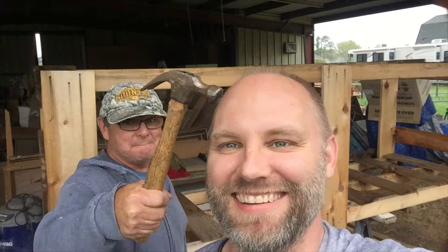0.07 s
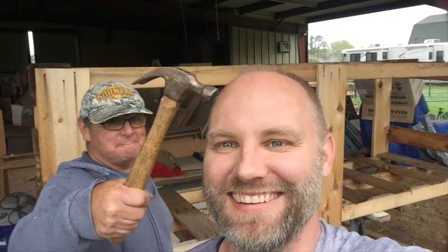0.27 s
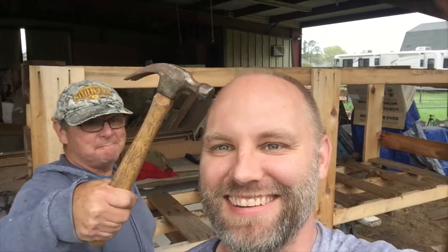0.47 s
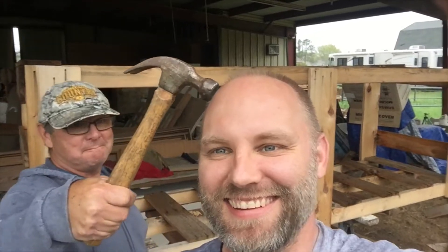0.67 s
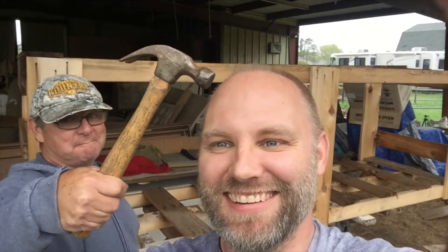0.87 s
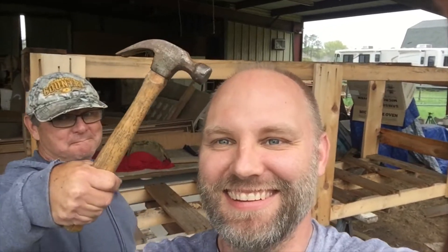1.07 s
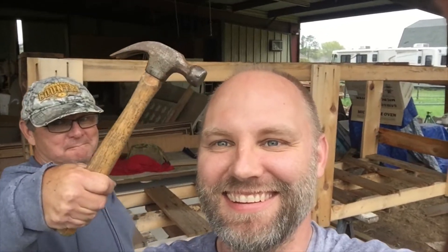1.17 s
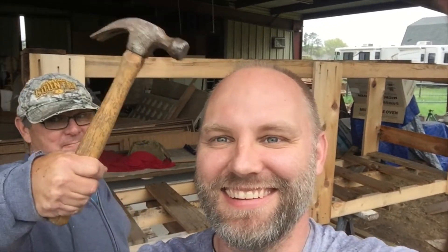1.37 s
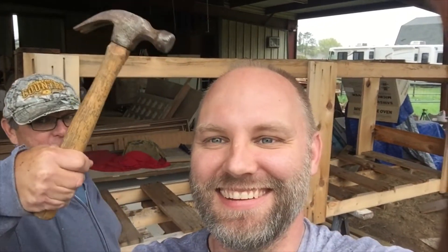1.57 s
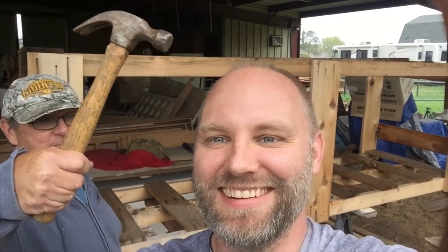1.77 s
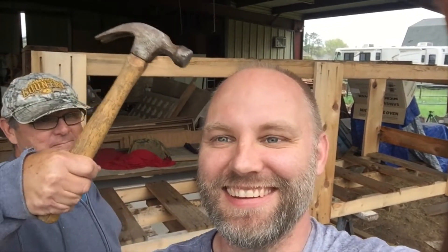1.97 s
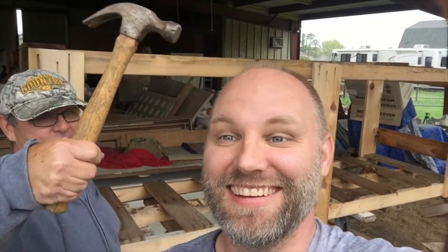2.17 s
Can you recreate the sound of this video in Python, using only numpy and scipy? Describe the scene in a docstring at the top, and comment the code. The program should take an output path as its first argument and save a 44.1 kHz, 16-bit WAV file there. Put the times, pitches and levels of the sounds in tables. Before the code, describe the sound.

Rain falls steadily around an open metal barn, with a low rumble underneath.

```python
"""Steady rain outside an open metal barn, heard from one microphone inside.
Countless drops merge into a dense, dull patter, drum on the sheet roof and leave a faint hiss of spray;
nearer drops ring briefly. A low rumble with a few soft bumps lies underneath, and there are a few
brief, faint rustles and one light knock. The sound fades in after a moment of silence."""
import sys
import numpy as np
from scipy import signal
from scipy.fft import rfft, irfft, next_fast_len
from scipy.io import wavfile
from scipy.ndimage import uniform_filter1d, map_coordinates

SR = 44100
rng = np.random.default_rng(int(sys.argv[2]) if len(sys.argv) > 2 else 0)


def file_out(sig):
    """Save sig as 16-bit WAV at sys.argv[1]."""
    # one column per channel
    cols = np.atleast_2d(sig).T
    # limit, then scale
    lim = np.clip(cols, -1, 1)
    pcm = np.round(lim * 32767).astype(np.int16)
    wavfile.write(sys.argv[1], SR, pcm)


N = 98254


def amp(db):
    """Decibels to gain."""
    return 10 ** (np.asarray(db) / 20)


def unit(x):
    """Scale to rms 1."""
    return x / np.sqrt(np.mean(x ** 2) + 1e-20)


def clock():
    """The time of each sample in seconds."""
    return np.arange(N) / SR


def curve(rows):
    """(seconds, value) points joined by straight lines."""
    return np.interp(clock(), *np.transpose(rows))


def wobble(per_s):
    """A smooth random curve through per_s knots a second."""
    knots = rng.standard_normal(1024)
    return map_coordinates(knots, [clock() * per_s], mode="wrap")


def filtered(x, response):
    """x through a filter whose gain is response(hz)."""
    size = next_fast_len(N + SR // 2)
    return irfft(rfft(x, size) * response(np.fft.rfftfreq(size, 1 / SR)), size)[:N]


def coloured(x, points):
    """x through a causal filter with the given (Hz, dB) shape, at rms 1."""
    points_hz, points_db = np.transpose(points)

    def minimum_phase(hz):
        db = np.interp(np.log(hz + 1), np.log(points_hz), points_db)
        cepstrum = irfft(np.log(amp(db)))
        half = len(cepstrum) // 2
        return np.exp(rfft(np.r_[cepstrum[0], 2 * cepstrum[1:half], np.zeros(half)]))
    return unit(filtered(x, minimum_phase))


def patchy(x, depth_db):
    """x with random patches of gain in time and frequency, at rms 1."""
    spectra = signal.stft(x, nperseg=512)[2]
    patches = uniform_filter1d(rng.standard_normal(spectra.shape), size=4, axis=0)
    patches = unit(uniform_filter1d(patches, size=8, axis=1))
    return unit(signal.istft(spectra * amp(depth_db * patches), nperseg=512)[1][:N])


def impacts(per_s, spread_db, wash_db):
    """Clicks at random times, over the wash of countless far ones."""
    hits = (rng.random(N) < per_s / SR) * np.sign(rng.standard_normal(N))
    sizes = amp(spread_db * rng.standard_normal(N))
    wash = amp(wash_db) * rng.standard_normal(N)
    return unit(unit(hits * sizes) + wash)


def patter():
    """Rain outside the barn: dense drops with a broad ring a little above 2 kHz."""
    # Each row: time in seconds, level in dB before the trim.
    levels = [(.19, -50.5), (.25, -54), (.49, -55), (.55, -49.5), (.62, -56), (.72, -53), (.81, -58),
              (.89, -50.5), (1.04, -56), (1.1, -51.5), (1.17, -54.5), (1.24, -52), (1.34, -55), (1.65, -54),
              (1.682, -49), (1.76, -54.5), (1.94, -52.5), (2.06, -56), (2.11, -50.5), (2.22, -57.5)]
    # Each row: frequency in Hz, relative level in dB.
    colour = [(700, -60), (1200, -12.5), (1650, -9), (1930, 0.5), (2230, 2.5), (2600, -3.5), (3100, -13),
              (3900, -24), (4800, -44.5), (8000, -77)]
    trim_db, flutter_db = -1.5, 0.8
    rain = patchy(impacts(per_s=2500, spread_db=0, wash_db=1.5), depth_db=0.5)
    return amp(trim_db + curve(levels) + flutter_db * wobble(24.53)) * coloured(rain, colour)


def near_drops():
    """Single drops nearer the microphone, each with a short ring at its own pitch."""
    # Each row: pitch of a drop in Hz, relative level in dB.
    colour = [(1000, -9.5), (2200, 0), (2800, -4.5), (3600, -13.5), (5000, -32.5)]
    per_s, level_db, size_range_db = 70, -60.5, 9
    centre_hz, spread_octaves = 2408, 0.3
    attack_s, t60_s = 0.0015, 0.12
    t = np.arange(SR // 4) / SR
    attack = 1 - np.exp(-t / attack_s)
    out = np.zeros(N + len(t))
    for when, pitch, size in rng.random((int(per_s * N / SR), 3)):
        octaves = spread_octaves * np.log(pitch / (1 - pitch)) / 2  # most fall near the centre
        hz = centre_hz * 2 ** octaves
        db = size_range_db * size + np.interp(hz, *np.transpose(colour))
        ring = amp(db - 60 * t / t60_s) * np.sin(2 * np.pi * hz * t)
        out[int(when * N):][:len(t)] += attack * ring
    return amp(level_db) * unit(out[:N])


def roof():
    """Overhead, drops drum on the low resonances of the sheet roof."""
    # Each row: time in seconds, level in dB before the trim.
    levels = [(.18, -55), (.25, -52.5), (.33, -54), (.39, -57), (.55, -56), (.8, -56.5), (1.03, -57),
              (1.09, -52.5), (1.24, -53.5), (1.35, -55.5), (1.48, -54.5), (1.6, -53), (1.65, -52.5),
              (1.685, -50.5), (1.735, -50.5), (1.84, -59), (1.94, -51), (2.08, -58.5), (2.14, -53),
              (2.22, -55)]
    # Each row: frequency in Hz, relative level in dB.
    resonances = [(50, -61), (130, -22.5), (230, 1), (310, -1), (375, 1.5), (470, -3.5), (630, -0.5),
                  (760, -5), (1060, 1), (1180, -4), (1420, -4), (1700, -15.5), (2300, -38), (5000, -76.5)]
    trim_db, flutter_db = -0.25, 0.25
    rain = patchy(impacts(per_s=1200, spread_db=2, wash_db=1.5), depth_db=3)
    return amp(trim_db + curve(levels) + flutter_db * wobble(14)) * coloured(rain, resonances)


def spray():
    """Fine spray reaches the microphone as a faint, even hiss."""
    # Each row: frequency in Hz, relative level in dB.
    colour = [(2500, -12), (4000, -7), (4900, -8), (5600, -3.5), (6250, 1), (7200, -5), (9600, -6),
              (10400, -11.5), (11600, -9.5), (13200, -15.5), (15600, -20)]
    level_db, flutter_db = -70.5, 0.23
    droplets = patchy(impacts(per_s=5800, spread_db=0.5, wash_db=-11), depth_db=3)
    return amp(level_db + flutter_db * wobble(11.4)) * coloured(droplets, colour)


def rumble():
    """A low, uneven rumble under the rain."""
    # Each row: time in seconds, level in dB before the trim.
    levels = [(.45, -51.5), (.7, -51.5), (.82, -55), (.92, -52.5), (1.25, -54), (1.6, -55.5), (1.76, -50.5),
              (1.86, -56), (1.98, -51.5), (2.22, -52)]
    # Each row: frequency in Hz, relative level in dB.
    colour = [(15, -60), (28, -13.5), (40, -1.5), (55, 9.5), (78, 5), (115, 2), (143, -1), (168, 0.5),
              (200, -7), (300, -44.5)]
    trim_db, flutter_db = 1.5, 1.2
    gain = amp(trim_db + curve(levels) + flutter_db * wobble(14.35))
    return gain * coloured(rng.standard_normal(N), colour)


def rustles():
    """Brief, faint swells of fine grains, each in its own band."""
    # Each row: peak time in seconds, level in dB, half length in seconds, band centre in Hz.
    swells = [(0.214, -67, 0.02, 3160), (0.23, -72, 0.025, 8900), (.337, -71, 0.012, 8100),
              (0.845, -69.5, .03, 3300), (0.872, -69.5, 0.027, 7150), (.897, -69, 0.013, 11400),
              (1.11, -72, 0.0075, 7500), (1.152, -71, .008, 8400), (1.672, -65.5, 0.0043, 6860),
              (1.683, -54, 0.016, 2460), (1.983, -72, .01, 7800), (2.11, -65.5, 0.011, 7700),
              (2.123, -68.5, 0.024, 3230)]
    width_octaves = 0.27
    out = np.zeros(N)
    for peak_s, db, half_s, centre_hz in swells:
        def band(hz):
            return np.exp(-(np.log2((hz + 1) / centre_hz) / width_octaves) ** 2 / 2)
        grains = impacts(per_s=5000, spread_db=5, wash_db=8)
        swell = np.exp(-((clock() - peak_s) / half_s) ** 2 / 2)
        out += amp(db) * swell * unit(filtered(grains, band))
    return out


def knock():
    """One light knock: a soft contact rings a few low, short modes."""
    # Each row: frequency in Hz, relative level in dB, seconds to fall by 60 dB.
    modes = [(107, 0, 0.097), (232.4, -6, 0.08), (401, -15, 0.072)]
    start_s, gain_db, attack_s = 0.236, -22, 0.012
    t = np.maximum(clock() - start_s, 0)
    ring = sum(amp(db - 60 * t / t60) * np.sin(2 * np.pi * hz * t) for hz, db, t60 in modes)
    return amp(gain_db) * (1 - np.exp(-t / attack_s)) * ring


def bumps():
    """Soft, low bumps in the rumble, a cycle or two each."""
    # Each row: peak time in seconds, peak level in dB, pitch in Hz.
    pulses = [(.36, -37, 73), (0.427, -39.5, 77), (0.919, -40, 63), (1.002, -45, 74), (1.236, -42, 65)]
    half_s = 0.016
    out = np.zeros(N)
    for peak_s, db, hz in pulses:
        t = clock() - peak_s
        out += amp(db) * np.exp(-(t / half_s) ** 2) * np.cos(2 * np.pi * hz * t)
    return out


def scene():
    """Everything as it reaches the one microphone inside the barn."""
    rain = patter() + near_drops() + roof() + spray()
    return (rain + rumble() + rustles() + knock() + bumps())[None]


def record(dry):
    """The recorder fades in and keeps nothing above its band limit."""
    silence_s, fade_s, top_hz = 0.12, 0.064, 15720
    fade = np.clip((clock() - silence_s) / fade_s, 0, 1) ** 0.99
    return filtered(dry[0] * fade, lambda hz: hz < top_hz)[None]


dry = scene()
out = record(dry)
file_out(out)
```